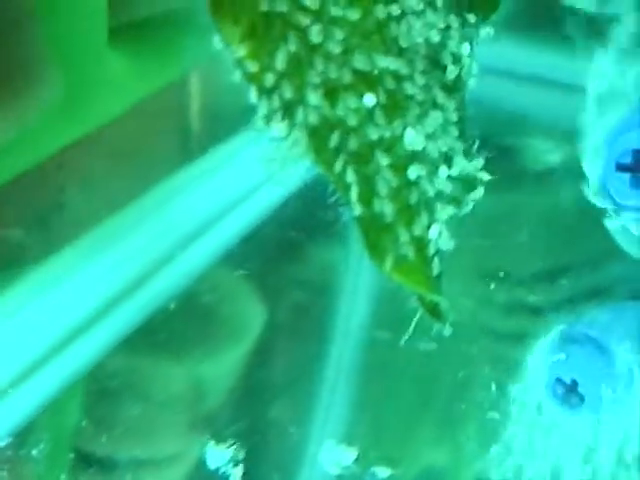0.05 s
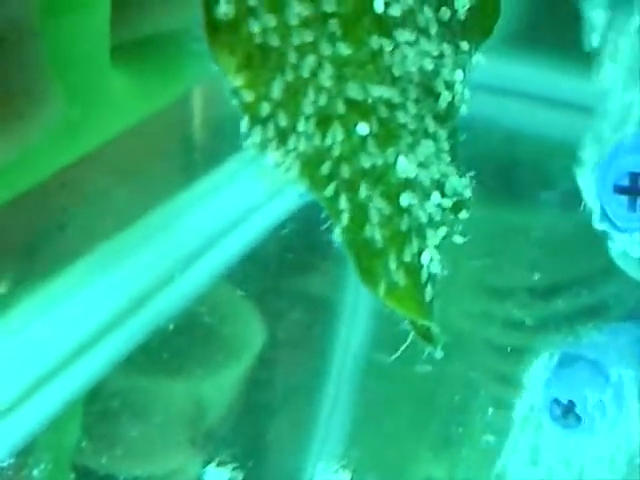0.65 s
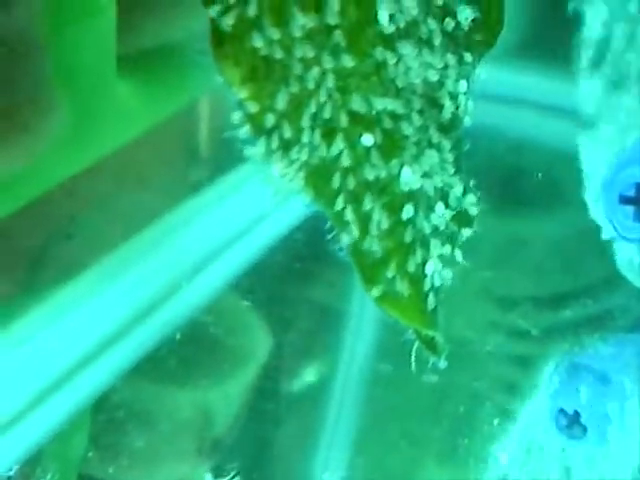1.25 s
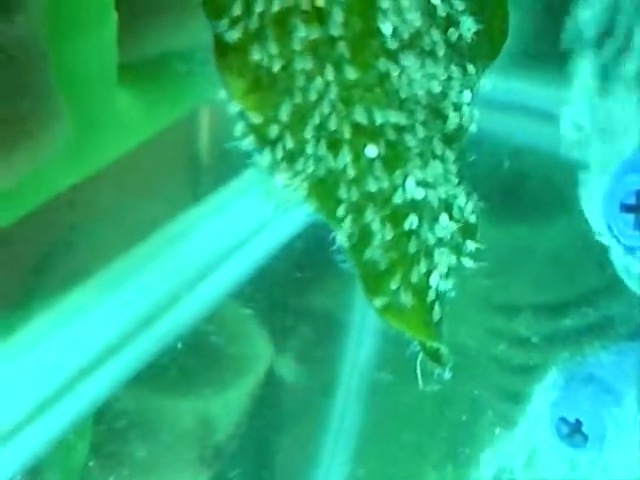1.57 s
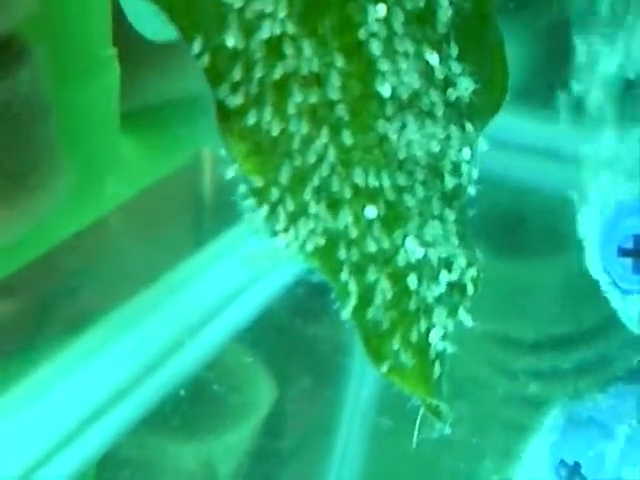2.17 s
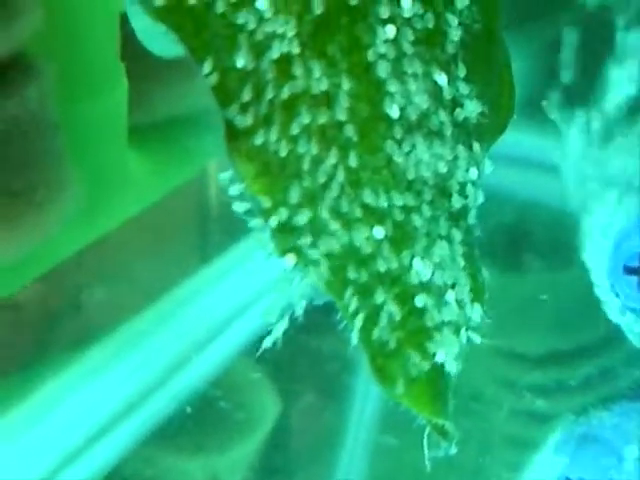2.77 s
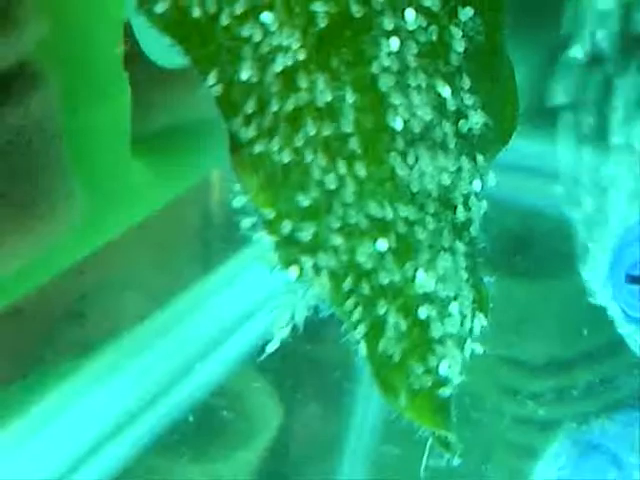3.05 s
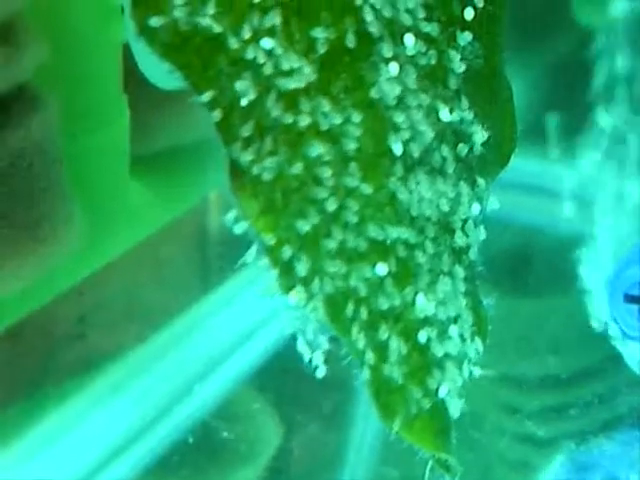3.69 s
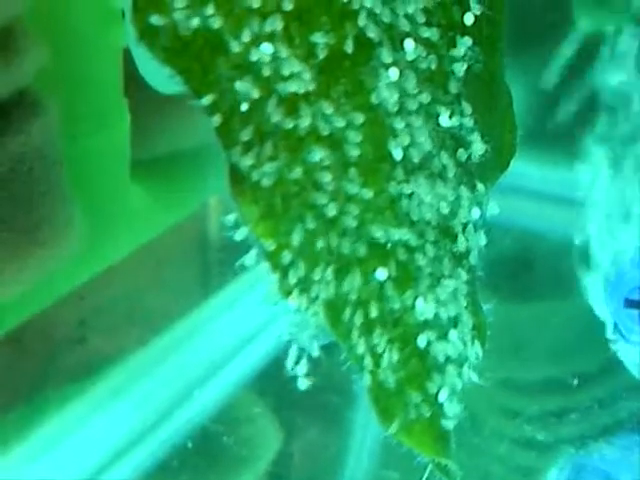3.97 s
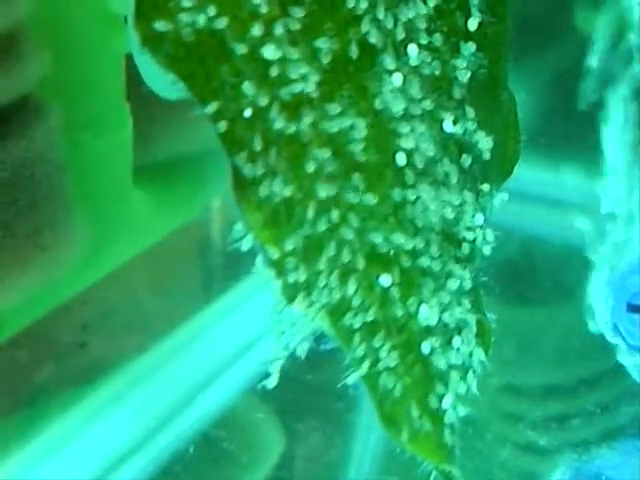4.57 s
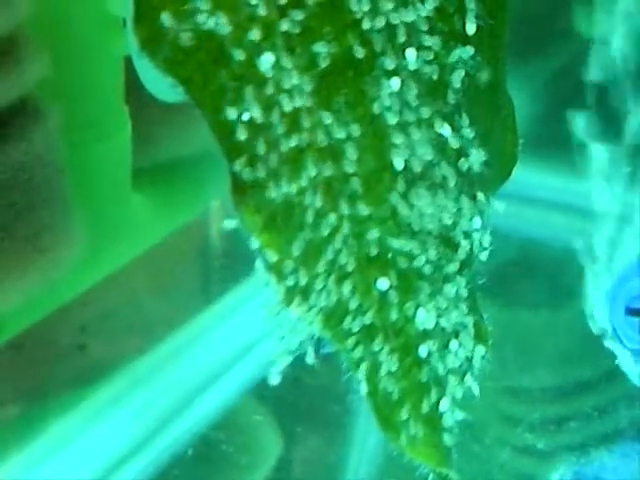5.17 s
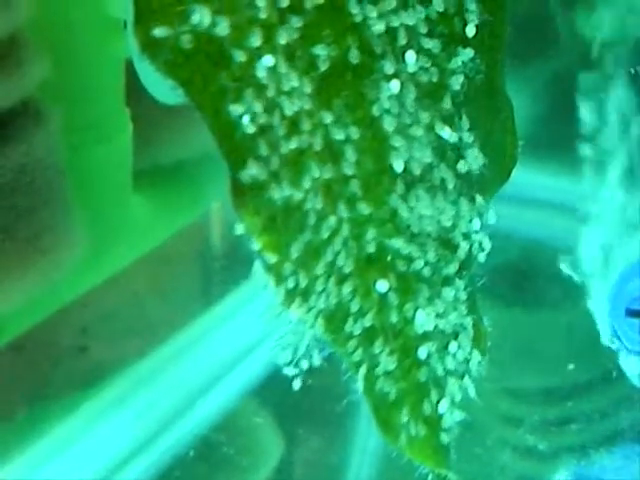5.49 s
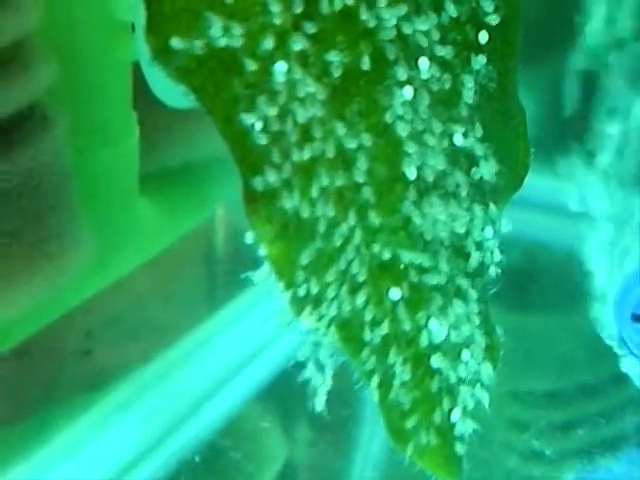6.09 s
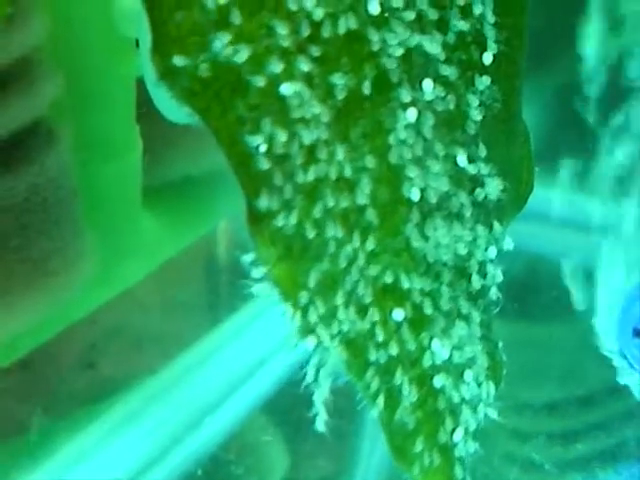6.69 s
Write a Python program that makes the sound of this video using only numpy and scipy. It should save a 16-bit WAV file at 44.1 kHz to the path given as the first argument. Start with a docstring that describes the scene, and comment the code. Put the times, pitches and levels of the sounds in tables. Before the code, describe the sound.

An air pump gives a steady low hum beside a home fish tank, heard from close by. Air churns through the water the whole time, with a soft rumble and a few deeper glugs at uneven intervals. Light splashing rings hollowly under the tank's hood, and fine bubbles burst at the surface in a faint, even fizz dotted with tiny pops and plinks.

```python
"""An air pump hums beside a home fish tank, heard close up on a phone with two microphones.
Its diaphragm buzzes in harmonics of the mains rate and puffs air into the water, where big bubbles
churn and glug and the tank rumbles softly. The splashing rings under the hood, and fine bubbles
burst at the surface in an even fizz, dotted with a few pops and plinks."""
import sys
import numpy as np
from scipy import signal
from scipy.fft import rfft, irfft
from scipy.io import wavfile
from scipy.ndimage import uniform_filter1d

SR = 44100
rng = np.random.default_rng(int(sys.argv[2]) if len(sys.argv) > 2 else 0)


def wrap_up_sound(samples):
    """Save the sound to the file named by the first command line argument, as 16-bit audio."""
    columns = np.atleast_2d(samples).T
    # keep every value between -1 and 1, then stretch to whole-number steps
    tamed = np.clip(columns, -1, 1)
    steps = np.round(tamed * 32767).astype(np.int16)
    wavfile.write(sys.argv[1], SR, steps)


N = 301203
TIME, FREQ = np.arange(N) / SR, np.arange(N // 2 + 1) * SR / N
MAINS_HZ = 49.92

# The hum's partials. Each row: mains multiple, left and right base level in dB, left lead in radians.
HUM_PARTIALS = [(2, -26.0, -20.0, -3.1), (3, -52.0, -41.0, 2.6), (4, -39.0, -43.0, -3.1),
                (5, -36.0, -35.0, 2.7), (6, -50.0, -46.0, -1.4), (10, -62.0, -77.0, 3.1),
                (11, -64.0, -80.0, -2.5), (13, -57.0, -57.0, -1.9), (15, -58.0, -62.0, -2.6),
                (17, -64.0, -74.0, -2.2), (18, -60.0, -77.0, -2.9), (20, -65.0, -71.0, -2.0),
                (23, -65.0, -74.0, -1.5), (25, -64.0, -72.0, -1.9), (45, -77, -77, -1.7),
                (47, -79, -79, -1.1)]
# The lowest tone's seeming waver against the rumble. Each row: time in seconds, relative level in dB.
SEEMING_WAVER = [(0, -24), (.42, -20), (.95, -21), (2.42, -22), (2.72, -20), (3.25, -22), (3.4, -17),
                 (3.49, -24.5), (3.56, -21.5), (3.77, -22.5), (3.87, -17), (4.05, -23.5), (4.13, -19.5),
                 (5.8, -21), (5.95, -16), (6.08, -21.5), (6.45, -16.5), (6.83, -22)]


def pump(waver_db=0.5, rattle_db=3.0, low_trim_db=-0.5, high_trim_db=-1.0):
    """The diaphragm's steady mains hum; its lowest tone seems to waver against the low rumble."""
    out = np.zeros((2, N))
    for multiple, left_db, right_db, lead in HUM_PARTIALS:
        highness = np.clip((multiple - 5) / 8, 0, 1)
        phase = 2 * np.pi * (multiple * MAINS_HZ * TIME + rng.random())
        wobble = drift(3.1)
        low_db = low_trim_db + waver_db * wobble
        high_db = high_trim_db + rattle_db * wobble  # the high partials waver with the load
        gain = undb((1 - highness) * low_db + highness * high_db)
        if multiple == 2:
            gain *= undb(swing(SEEMING_WAVER))
        tone = np.array([undb(left_db) * np.sin(phase + lead), undb(right_db) * np.sin(phase)])
        out += np.sqrt(2) * gain * tone
    return out


# The big glugs. Each row: start in seconds, right peak in dB, starting pitch in Hz.
GLUG_CUES = [(0.548, -22, 268), (1.733, -20, 264), (2.326, -23, 280), (2.70, -22, 250), (2.735, -20, 290),
             (2.795, -17.5, 262), (3.672, -19, 270), (3.785, -20, 270), (4.05, -19.5, 258),
             (4.66, -22, 250), (6.045, -22, 260), (6.075, -21, 262)]
# The churn's hollow body. Each row: frequency in Hz, left and right level in dB per Hz before trim.
CHURN_EQ = [(150, -67, -65), (200, -58.5, -59.5), (235, -58.5, -57), (265, -53.5, -49), (288, -58.5, -54),
            (312, -56.5, -53.5), (330, -64, -66), (352, -69, -78), (372, -86, -90)]


def churn(trim_db=-0.5, glug_left_db=-5, throb_db=1.24):
    """Large bubbles break off the air outlet in uneven gulps; each big glug stirs up smaller ones."""
    rings = chirps(GLUG_CUES, cycles=32, glide=.08, swell=3.2)  # pitch rises as they near the surface
    stir = 1 + 9 * uniform_filter1d(np.abs(rings), SR // 12)
    lead = np.interp(FREQ, [210, 250], [2.2, np.pi])
    births = clicks(per_s=160, spread_db=1.5)
    water = mic_pair(births, rng.standard_normal((2, N)), share=0.73, lead=lead)
    water *= undb(throb_db * drift(28))
    glugs = np.array([undb(glug_left_db) * shift(rings, 2.3), rings])
    return colour(water * stir, CHURN_EQ, trim_db) + glugs


# The tank's low end. Each row: frequency in Hz, left and right level in dB per Hz before trim.
RUMBLE_EQ = [(26, -76, -70), (50, -61, -59), (80, -53, -47), (100, -52, -47.5), (122, -53.5, -52),
             (160, -61, -58), (230, -67, -67)]
# Slow surges. Each row: time in seconds, relative level in dB before scaling by ride_depth.
SURGE_RIDE = [(0, -44), (.6, -41.5), (1.3, -47.5), (2.1, -45.5), (2.7, -43), (3.2, -39), (3.9, -44),
              (5.0, -46.5), (6.83, -44)]
# Soft low bumps. Each row: start in seconds, right peak in dB, starting pitch in Hz.
BUMP_CUES = [(.585, -27, 52), (2.06, -30, 56), (2.072, -25, 187), (3.115, -22, 125), (3.135, -28, 72)]


def rumble(trim_db=-1.5, ride_depth=0.4, heave_db=3.27, throb_db=1.0, bump_left_db=-4):
    """Moving water shakes the tank in slow surges and quick heaves, now and then with a soft bump."""
    body = mic_pair(rng.standard_normal(N), rng.standard_normal((2, N)), share=0.53, lead=np.pi)
    bumps = chirps(BUMP_CUES, cycles=6, glide=.02, swell=1.4)
    gain = undb(ride_depth * swing(SURGE_RIDE) + heave_db * drift(40) + throb_db * drift(29))
    return colour(body * gain, RUMBLE_EQ, trim_db) + bumps * undb([[bump_left_db], [0]])


# Splash and rushing air. Each row: frequency in Hz, left and right level in dB per Hz before trim.
WASH_EQ = [(400.0, -75.8, -82.0), (570.0, -74.3, -85.4), (670.0, -72.3, -70.1), (850.0, -72.6, -79.3),
           (1050.0, -76.1, -83.3), (1400.0, -77.0, -82.2), (1800.0, -80.6, -84.8), (2300.0, -88.8, -87.7),
           (3000.0, -91.4, -91.8), (3700, -91, -91)]
# Standing waves put the two sides out of step. Each row: frequency in Hz, left lead in radians.
WASH_PHASE = [(450, 3.3), (750, 3.9), (1000, 4.0), (1100, 4.6), (1220, 5.0), (1310, 3.4), (1700, 4.2),
              (2400, 4.4)]
# The air ringing under the hood. Each row: frequency in Hz, left and right boost in dB.
HOOD_RESONANCES = [(733.0, 3.8, 2.7), (755.0, 7.1, 5.4), (832.0, 4.7, -1.2), (924.0, 4.0, 6.0),
                   (1125.0, 5.0, 5.0), (1228.0, 4.5, 6.3), (1364.0, 6.0, 9.8), (1565.0, 3.4, 4.9),
                   (1736.0, 4.5, 5.4), (2020.0, 2.8, 1.8)]


def wash(trim_db=-1.27, puff_db=1.8, gurgle_db=-13, lull_db=3.5, hood_q=31):
    """Splashes and gurgles ring under the hood, pulsing with each pump stroke; the lows briefly lull."""
    stroke = 2 * np.pi * MAINS_HZ * TIME
    flow = undb(puff_db * (np.cos(stroke) + np.cos(3 * stroke)) / 2)
    gurgles = swarm(600, 1900, count=700, spread_db=2.0, ring_s=.07)
    splashes = clicks(per_s=7000, spread_db=2.0) + undb(gurgle_db) * gurgles
    lead = np.interp(FREQ, *np.transpose(WASH_PHASE))
    water = mic_pair(splashes, rng.standard_normal((2, N)), share=0.68, lead=lead)
    lows = irfft(rfft(water) / (1 + (FREQ / 480) ** 12), N)
    water = water - lows + lows * undb(lull_db * (drift(9.6) + 0.5))
    hood_db = sum(np.array([[left], [right]]) / (1 + (2 * hood_q * (FREQ / hz - 1)) ** 2)
                  for hz, left, right in HOOD_RESONANCES)
    return colour(water * flow, WASH_EQ, hood_db + trim_db)


# Faint midrange blips. Each row: start in seconds, left peak in dB, starting pitch in Hz.
BLIP_CUES = [(0.148, -37, 719), (1.099, -40, 781), (1.955, -40, 875), (2.782, -39, 867), (3.778, -36, 880),
             (4.228, -39, 773), (4.858, -39, 1160)]


def blips(right_db=-5):
    """Faint short midrange blips in the wash, in opposite polarity left and right."""
    tones = chirps(BLIP_CUES, cycles=45, glide=.06, swell=3)
    return tones * np.array([[1], [-undb(right_db)]])


# The airy top of the fizz. Each row: frequency in Hz, level in dB per Hz before trim.
SPRAY_EQ = [(7500, -110), (8500, -102), (9100, -96), (10500, -94), (12600, -93), (13400, -100)]
# A fader ride on the spray. Each row: time in seconds, relative level in dB.
SPRAY_RIDE = [(0, -54), (.15, -57), (.28, -52.5), (.47, -56), (.68, -54), (.82, -55.5), (.91, -50.5),
              (1.1, -56), (1.42, -53.5), (1.58, -55), (1.72, -54.5), (3.65, -54), (4.09, -54.5),
              (5.1, -53.5), (5.38, -53.5), (5.63, -56), (6.12, -54), (6.55, -54.5), (6.76, -56.5)]


def spray(activity, trim_db=-0.65, left_db=-0.9):
    """The films of the finest bubbles tear in crackling flurries."""
    rings = swarm(8300, 13800, count=5000, spread_db=2.2, ring_s=.012)
    crackle = clicks(per_s=3300, spread_db=2.7)
    bursts = clustered(crackle + .5 * rings, activity, share=0.44)
    fizz = mic_pair(bursts, reflections(bursts, t60=.05), share=.38, lead=-.15)
    fizz *= undb(swing(SPRAY_RIDE))
    return colour(fizz, SPRAY_EQ, trim_db) * undb([[left_db], [0]])


# The lower, ringing fizz. Each row: frequency in Hz, level in dB per Hz before trim.
TINKLE_EQ = [(2000, -104), (3100, -102), (3700, -96), (4100, -93.5), (5400, -91.5), (6300, -94.5),
             (7100, -99)]
# Its fader ride. Each row: time in seconds, relative level in dB before scaling by ride_depth.
TINKLE_RIDE = [(0, -55.5), (.16, -65), (.28, -56.5), (.54, -65.5), (.72, -56.5), (1.28, -58), (1.47, -63),
               (1.75, -56.5), (1.93, -63), (2.03, -55.5), (2.42, -60), (2.55, -54.5), (3.57, -58),
               (3.68, -58.5), (4.55, -59), (4.78, -57.5), (5.06, -60.5), (5.48, -53.5), (5.6, -61),
               (6.24, -55.5), (6.34, -66), (6.44, -57.5), (6.56, -62.5), (6.83, -62.5)]


def tinkle(activity, trim_db=-3.0, ride_depth=0.57):
    """A dense crowd of small bubbles rings at the surface, and the glass adds a short haze."""
    rings = swarm(2000, 7600, count=7000, spread_db=2.0, ring_s=.013)
    crackle = clicks(per_s=5800, spread_db=-4.0)
    bursts = clustered(rings + crackle, activity, share=0.25)
    fizz = mic_pair(bursts, reflections(bursts, t60=.06), share=.36, lead=-.15)
    fizz *= undb(ride_depth * swing(TINKLE_RIDE))
    return colour(fizz, TINKLE_EQ, trim_db)


# Crisp surface pops. Each row: start in seconds, level in dB before trim, band centre in Hz.
POP_CUES = [(1.1701, -43, 11000), (1.3188, -46, 11700), (2.246, -47, 10500), (2.7725, -47, 10400),
            (3.0718, -44.5, 10300), (3.1726, -49, 11500), (3.6969, -46, 10500), (4.136, -44, 10700),
            (4.51, -35.5, 11100), (5.8226, -46, 9580)]


def pops(trim_db=-6.5, half_width_hz=1500, attack_s=.004, t60=0.042, droplets_per_s=4000):
    """A nearer bubble film tears and throws a brief patter of droplets."""
    out, age = np.zeros((2, N)), TIME[:SR // 8]
    hz = np.fft.rfftfreq(len(age), 1 / SR)
    envelope = (1 - np.exp(-age / attack_s)) * np.exp(-np.log(1000) * age / t60)
    envelope /= envelope.max()
    for start, db, centre_hz in POP_CUES:
        droplets = rng.standard_normal(len(age)) * (rng.random(len(age)) < droplets_per_s / SR)
        patter = rng.standard_normal((2, len(age))) + unit(droplets)
        band = 1 / (1 + ((hz - centre_hz) / half_width_hz) ** 4)
        burst = unit(irfft(rfft(patter) * band, len(age)))
        add(out, start, burst * envelope * undb(db + trim_db))
    return out


# Tiny bright plinks. Each row: start in seconds, peak in dB before trim, starting pitch in Hz.
PLINK_CUES = [(1.0544, -47, 5000), (2.1844, -46, 5350), (3.4111, -46, 5030), (3.6501, -51, 4770),
              (5.4829, -45, 5000), (6.4443, -44, 5720), (6.4742, -42, 2280)]


def plinks(trim_db=-3):
    """Now and then one small bubble rings clear of the crowd."""
    return undb(trim_db) * chirps(PLINK_CUES, cycles=170, glide=0.12, swell=3.9)


def chirps(cues, cycles, glide, swell):
    """Short tones that build for `swell` cycles and die by `cycles`, rising by the fraction `glide`."""
    out = np.zeros(N)
    for start, db, hz in cues:
        periods = np.arange(int(SR * cycles / hz)) / SR * hz
        ring = np.sin(2 * np.pi * periods * (1 + glide * periods / cycles / 2))
        ring *= (1 - np.exp(-(periods / swell) ** 2)) * np.exp(-np.log(1000) * periods / cycles)
        add(out, start, undb(db) * ring / np.abs(ring).max())
    return out


def swarm(low_hz, high_hz, count, spread_db, ring_s):
    """A crowd of bubbles of random size, each ringing briefly at a rising pitch."""
    age = TIME[:int(SR * ring_s)]
    when, pitch, luck = rng.random((count, 3)).T[:, :, None]
    hz = low_hz + (high_hz - low_hz) * pitch
    gain = undb(-spread_db * np.log(luck + .006))
    rings = gain * np.sin(2 * np.pi * hz * age * (1 + .02 * age / ring_s))
    rings *= age / ring_s * np.exp(-9 * age / ring_s)
    index = (when * N).astype(int) + np.arange(len(age))
    return unit(np.bincount(index.ravel() % N, rings.ravel(), N))


def clicks(per_s, spread_db):
    """Random impulses; a positive spread makes a few much louder, a negative one a few much softer."""
    size = undb(spread_db * np.minimum(rng.exponential(size=N), 4.5))
    return unit((rng.random(N) < per_s / SR) * size * rng.choice([-1, 1], N))


def flurries(per_s, fade_s):
    """Bubbles set each other off: an activity curve of mean 1 that jumps at random and dies away."""
    starts = (rng.random(N) < per_s / SR) * rng.uniform(.3, 1, N)
    activity = np.abs(signal.fftconvolve(starts, np.exp(-TIME[:SR // 4] / fade_s))[:N])
    return activity / activity.mean()


def clustered(x, activity, share):
    """Let a share of the bubbling come in flurries; the rest stays even."""
    return unit(x * np.sqrt(1 - share + share * activity))


def reflections(x, t60):
    """Dense echoes between glass and hood leave a fading haze, different at each microphone."""
    decay = np.exp(-2 * np.log(1000) * TIME[:SR // 4] / t60)
    energy = signal.fftconvolve(x ** 2, decay)[:N]
    return unit(rng.standard_normal((2, N)) * np.sqrt(np.abs(energy)))


def mic_pair(direct, diffuse, share, lead):
    """Both microphones hear the direct sound, the left `lead` radians ahead, plus their own haze."""
    pair = np.array([shift(direct, lead), direct])
    return np.sqrt(share) * unit(pair) + np.sqrt(1 - share) * unit(diffuse)


def colour(x, eq, lift_db):
    """Shape a sound with an EQ table, rolling off 24 dB an octave beyond its ends."""
    hz, *sides = np.transpose(eq)
    octave, points = np.log2(FREQ + 1), np.log2(hz)
    outside = np.maximum(points[0] - octave, 0) + np.maximum(octave - points[-1], 0)
    db = np.array([np.interp(octave, points, side) for side in sides]) - 24 * outside
    return irfft(rfft(x) * undb(db + lift_db) * np.sqrt(SR / 2), N)


def drift(cutoff_hz, points=4096):
    """Smooth random movement of rms 1, mostly slower than the cutoff."""
    lowpass = np.exp(-(FREQ[:points // 2 + 1] / cutoff_hz) ** 2)
    curve = irfft(rfft(rng.standard_normal(points)) * lowpass, points)
    return unit(np.interp(TIME, np.linspace(0, N / SR, points), curve))


def swing(ride):
    """A level curve's swing about its mean, in dB at every sample."""
    db = np.interp(TIME, *np.transpose(ride))
    return db - db.mean()


def shift(x, radians):
    """Turn the phase of a sound."""
    return irfft(rfft(x) * np.exp(1j * radians), N)


def add(out, start_s, sound):
    """Mix a sound in at its start time."""
    start = int(start_s * SR)
    out[..., start:start + sound.shape[-1]] += sound[..., :N - start]


def undb(db):
    """Decibels to gain."""
    return 10 ** (np.asarray(db) / 20)


def unit(x):
    """Scale to rms 1."""
    return x / np.sqrt(np.mean(x ** 2))


def scene():
    """Pump and water together; the same flurries stir both kinds of fizz."""
    activity = flurries(per_s=45, fade_s=0.021)
    fizz = tinkle(activity) + spray(activity) + pops() + plinks()
    return pump() + rumble() + churn() + wash() + blips() + fizz


def record(dry):
    """The phone leaves a narrow gap in the treble and cuts the top."""
    notch_hz, half_width_hz, top_hz = 7900, 520, 13500
    notch = 1 - np.exp(-((FREQ - notch_hz) / half_width_hz) ** 4)
    lowpass = 1 / (1 + (FREQ / top_hz) ** 200)
    return irfft(rfft(dry) * notch * lowpass, N)


dry = scene()
out = record(dry)
wrap_up_sound(out)
```